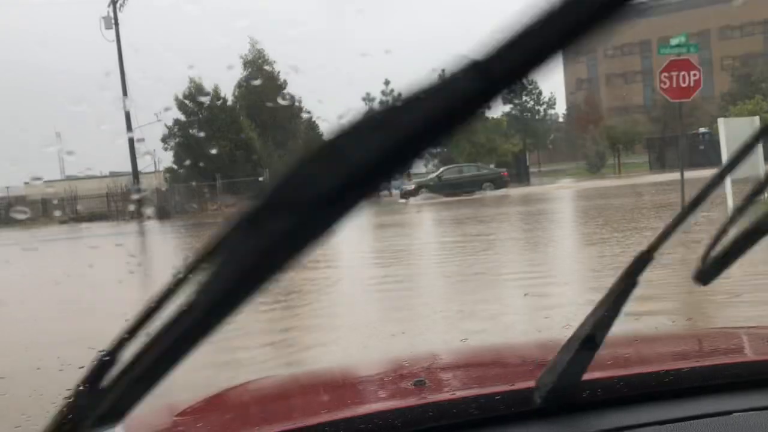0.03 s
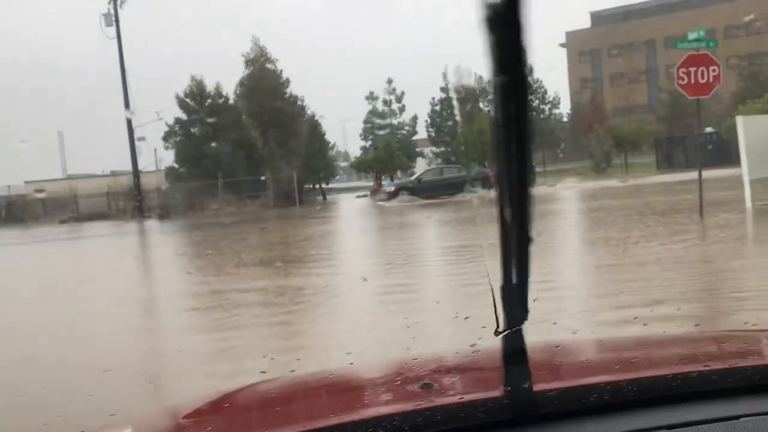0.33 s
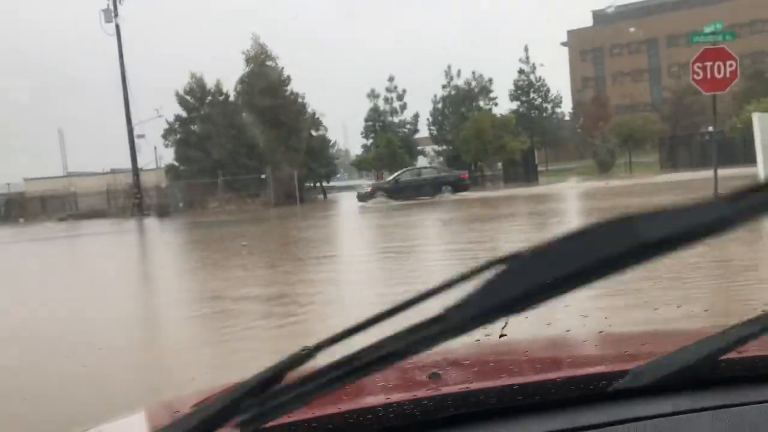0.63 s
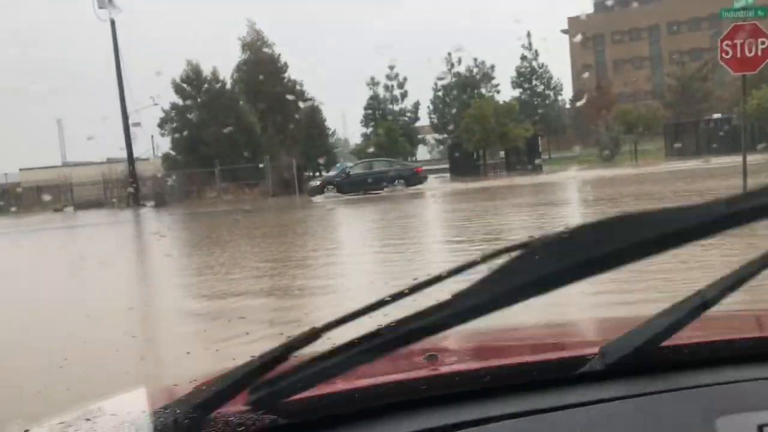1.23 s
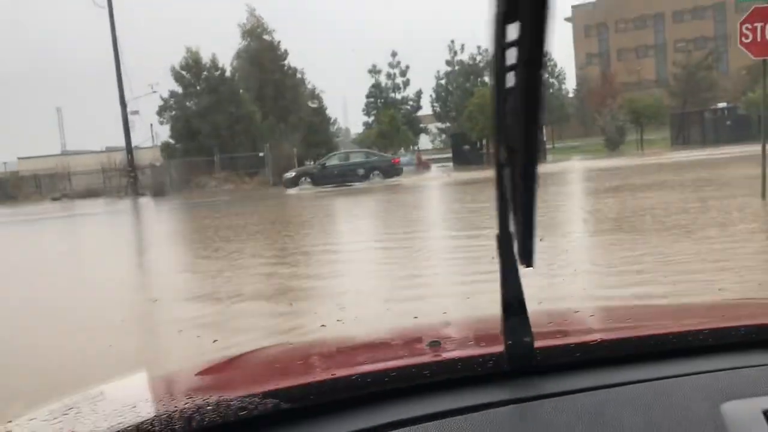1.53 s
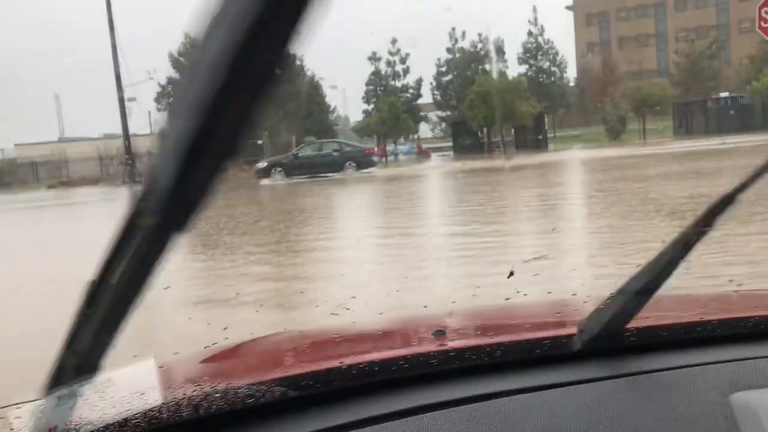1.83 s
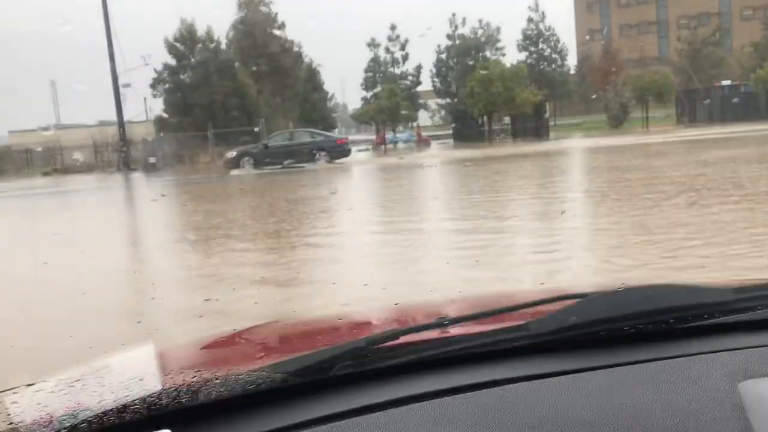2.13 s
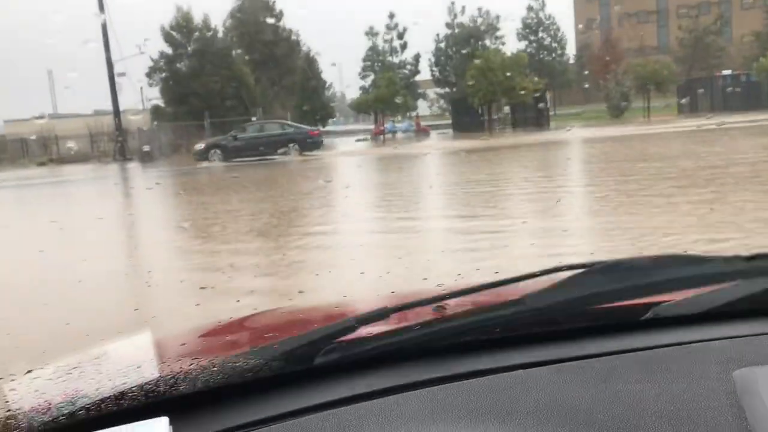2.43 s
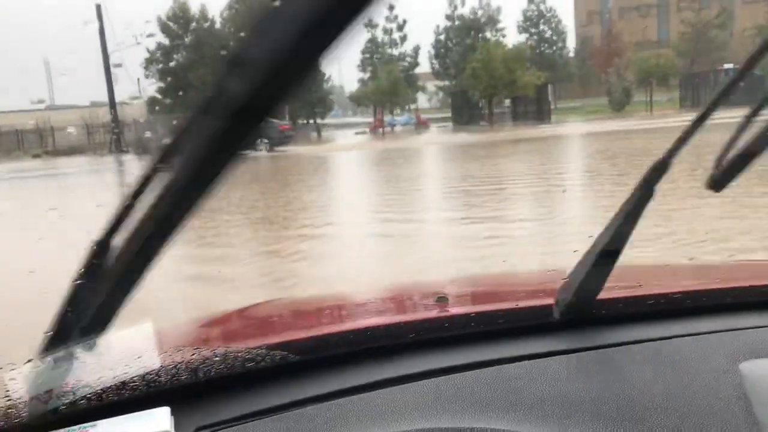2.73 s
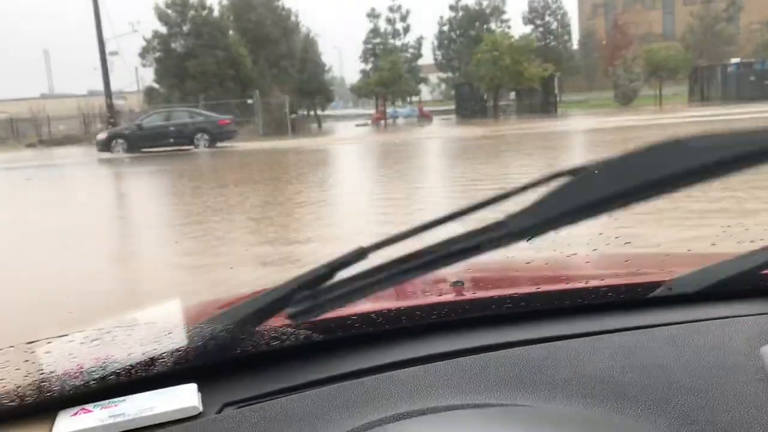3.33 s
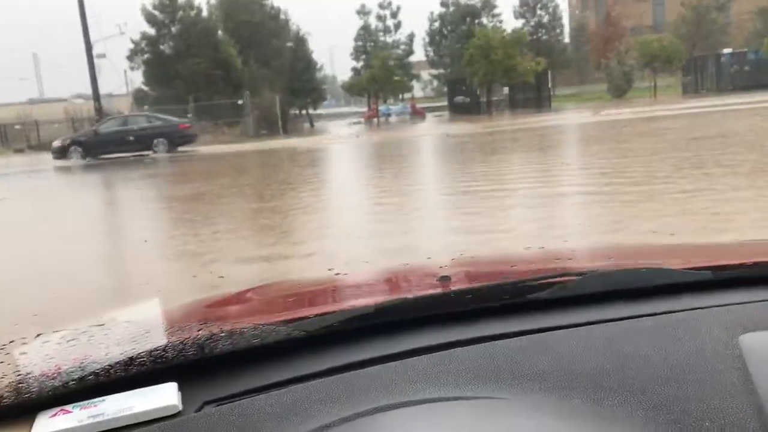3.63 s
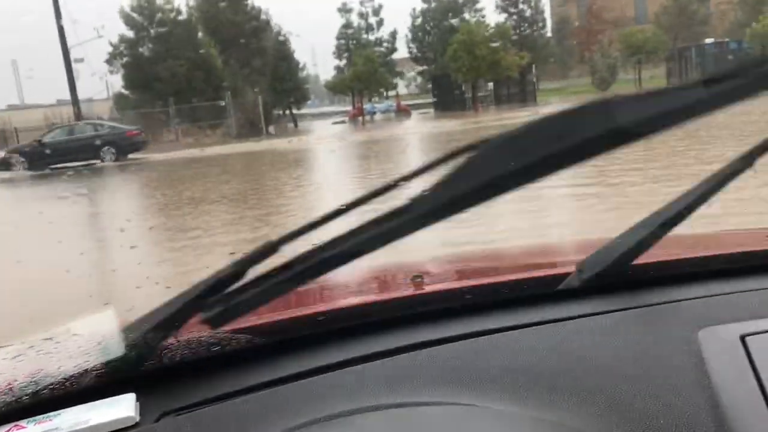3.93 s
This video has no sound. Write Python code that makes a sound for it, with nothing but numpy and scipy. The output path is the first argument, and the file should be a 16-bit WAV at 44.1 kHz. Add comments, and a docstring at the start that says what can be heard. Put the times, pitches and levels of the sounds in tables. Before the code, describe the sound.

Windshield wipers thump and swish quickly, heard inside an idling car in soft rain.

```python
"""Windscreen wipers run fast, three sweeps up and back, heard inside a car idling in the rain.
At each end of the stroke the rubber blades flip over and the arms thump, deep at the top and more
wooden at the bottom. Between the turns the blades swish over the wet glass and the wiper motor hums.
Behind them the engine drones and soft rain falls on the car's body."""
import sys
import numpy as np
from scipy import signal
from scipy.fft import rfft, irfft
from scipy.io import wavfile
from scipy.ndimage import uniform_filter1d

SR = 44100
rng = np.random.default_rng(int(sys.argv[2]) if len(sys.argv) > 2 else 0)


def log_audio(samples):
    """Write samples as a 16-bit WAV file to the path given in sys.argv[1]."""
    # one column per channel
    frames = np.atleast_2d(samples).T
    # limit to full scale, then quantise
    limited = np.clip(frames, -1, 1)
    pcm = np.round(limited * 32767).astype(np.int16)
    wavfile.write(sys.argv[1], SR, pcm)


N = 176400

# how fast the engine fires: time_s, rate_hz
ENGINE_FIRING = [(0, 40.02), (1.1, 40.07), (1.3, 39.07), (1.8, 39.7), (3.3, 38.97), (3.55, 39.84),
                 (4, 39.43)]
# the engine's deepest tone: time_s, level_db
ENGINE_BOOM = [(0, -29.5), (.36, -30), (.45, -26.5), (.54, -31), (1.13, -30), (1.22, -35.5), (1.29, -29.5),
               (2.36, -32), (2.5, -35.5), (2.62, -32), (3.09, -30.5), (3.16, -37), (3.23, -41),
               (3.29, -27.5), (3.45, -30.5), (4, -30.5)]
# engine tones at 2 to 7 times the firing rate: level_db
ENGINE_OVERTONES = [-35.5, -45.5, -53.5, -58.5, -57, -60]
# low rumble in the cabin: frequency_hz, level_db
RUMBLE_COLOUR = [(25, -11.5), (48, 8.5), (65, 0), (95, -1.5), (130, -1), (200, -10), (300, -16.5),
                 (450, -23), (640, -25), (780, -42), (1500, -53)]
# the wash of rain: frequency_hz, level_db
RAIN_COLOUR = [(400, -15.5), (800, 5), (1500, -4.5), (2800, -7.5), (4000, -12), (4900, -16.5),
               (6300, -18), (7600, -22.5), (12000, -22), (16000, -25)]
# how the rain swells and eases: time_s, gain_db
RAIN_LEVEL = [(0, 3), (.6, 1.5), (1.2, 1), (2.5, 1), (3.3, 0), (4, 1.5)]
# the tick of single drops: frequency_hz, level_db
DROP_COLOUR = [(400, -8.5), (1200, 2), (2800, 2.5), (5000, -12.5), (12000, -18)]
# the wiper motor through one wipe: time_s, pitch_hz, gain_db
MOTOR_HUM = [(0, 295, -1.5), (.2, 305, -5), (.36, 290, -14.5), (0.548, 308, -9.5), (0.699, 327, 0.5),
             (0.879, 333, 2.5), (0.969, 324, 2), (1.031, 316, 8), (1.091, 295, -28.5), (1.242, 287, -2.5),
             (1.336, 295, -9)]
# rubber sliding on glass: frequency_hz, level_db
RUB_COLOUR = [(100, -18), (165, 18.5), (240, -1), (380, -5.5), (540, -20.5), (680, -14), (900, -23),
              (2500, -38.5), (5000, -50), (12000, -59)]
# rubber sticking and slipping: frequency_hz, level_db
CATCH_COLOUR = [(150, -5), (220, 1.5), (380, -3), (540, -17.5), (680, -13), (900, -28), (1800, -41)]
# light knocks as the blades flip over, with fainter knocks of the wipers in between: start_s, level_db
KNOCKS = [(0.188, -36.5), (.234, -42), (.287, -32), (.934, -27.5), (1.115, -37.5), (1.273, -35),
          (1.38, -37.5), (1.608, -39), (1.625, -32), (2.272, -27), (2.452, -36), (2.637, -37.5),
          (2.964, -33), (3.608, -27.5), (3.791, -44), (3.952, -39)]
# tones these knocks ring with (fade_s is the time to fall 60 dB): pitch_hz, level_db, fade_s
KNOCK_TONES = [(163.5, -5, 0.28), (250, -3, 0.067), (315, -2.5, 0.022), (406, -5, 0.058), (489, -10, 0.078),
               (623, -17.5, 0.093)]
# water squeezed out by a blade: peak_s, level_db, centre_hz, width_s
SQUELCHES = [(.290, -58, 2600, 0.0042), (.357, -58, 2000, 0.0046), (.928, -74, 5600, .006),
             (.957, -75, 6200, 0.0073), (1.032, -67, 3400, .004), (1.552, -68, 1500, 0.0047),
             (1.629, -59.5, 2700, 0.005), (1.701, -58.5, 2340, 0.0052), (1.845, -61, 1550, 0.0056),
             (2.275, -71, 5900, .007), (2.297, -69.5, 5750, 0.0091), (2.376, -65, 3000, 0.0056),
             (2.965, -61.5, 2640, 0.0055), (3.035, -68.5, 3206, .007), (3.61, -67, 4220, .006),
             (3.63, -70, 6050, 0.012), (3.711, -62.5, 3100, 0.0044)]
# a squelch's broad band of noise: multiple_of_centre, level_db
SQUELCH_SHAPE = [(.25, -17), (.6, -1), (1, 1), (1.3, -8), (1.8, -17), (3, -29.5)]
# tiny squeaks of the rubber edge: peak_s, level_db, centre_hz, width_s
SQUEAKS = [(1.612, -78, 9300, 0.013), (1.638, -79, 10900, .008)]
# a squeak's narrow band of noise: multiple_of_centre, level_db
SQUEAK_SHAPE = [(.85, -35), (.97, -6), (1, 7), (1.03, -6), (1.15, -35)]
# thumps at the top turn: start_s, level_db, pitch_ratio, rebound_after_s, rebound_db, slap_db
TOP_THUMPS = [(.350, -22.5, 0.98, .027, -13, -35.5), (1.699, -24, 1.005, .026, -5, -35.5),
              (3.026, -21.5, 1.01, .029, -15, -35.5)]
# thumps at the bottom turn: start_s, level_db, pitch_ratio, rebound_after_s, rebound_db, slap_db
BOTTOM_THUMPS = [(1.006, -25.5, 1.005, .0235, -4.5, -38), (2.348, -27.5, 1.02, 0.026, -7.5, -41.5),
                 (3.685, -25.5, 1.002, .0235, -5.5, -40)]
# the arms and the panel under them ringing at the top turn: pitch_hz, level_db, fade_s
TOP_TONES = [(111.46, -3.5, 0.63), (144.3, 6, .14), (180, -3.5, 0.13), (217.8, -5.5, 0.28),
             (262, -1, 0.142), (375, -1, 0.068), (431.6, -14, 0.12), (638.5, -21.5, 0.11), (810, -35, 0.07),
             (970, -51, 0.068)]
# the same parts ringing at the bottom turn: pitch_hz, level_db, fade_s
BOTTOM_TONES = [(117.7, -2.5, 0.39), (165, -3, 0.13), (279, -8, 0.12), (339, 2.5, 0.07),
                (372.7, -8.5, 0.12), (438.8, -10.5, 0.19), (578.5, -8, 0.085), (878, -29.5, .07),
                (1153, -31.5, 0.096)]
# wet rubber slapping the glass: frequency_hz, level_db
SLAP_COLOUR = [(150, -1.5), (350, 8.5), (600, -8.5), (900, -15), (1500, -28), (2800, -40), (4500, -47),
               (9000, -55), (15000, -54.5)]

WIPE_S, TOP_TURN_S, BOTTOM_TURN_S = 1.336, 0.4, 1.1  # one wipe, and when in it the blades turn


def undb(db):
    """Turn decibels into a number to multiply by."""
    return 10 ** (np.asarray(db) / 20)


def clock():
    """The time of each sample, in seconds."""
    return np.arange(N) / SR


def curve(rows):
    """Join (time_s, value) points with straight lines."""
    times, values = np.array(rows).T
    return np.interp(clock(), times, values)


def colour(sound, points):
    """Set a sound's lows and highs by (frequency_hz, level_db) points, then scale it to strength 1."""
    hz, db = np.array(points).T
    freqs = np.maximum(np.arange(len(sound) // 2 + 1) * SR / len(sound), 1)
    gain = undb(np.interp(np.log(freqs), np.log(hz), db))
    edge_fade = np.minimum(freqs / hz[0], 1) ** 2 * np.minimum(hz[-1] / freqs, 1) ** 2
    shaped = irfft(rfft(sound) * gain * edge_fade, len(sound))
    return shaped / shaped.std()


def noise(points):
    """Steady noise with the given colour."""
    return colour(rng.standard_normal(N), points)


def wobble(rate_hz):
    """A smooth random drift, typically about 1 either side of zero."""
    step = int(SR / rate_hz)
    stairs = np.repeat(rng.standard_normal(400), step)[:N]
    smooth = uniform_filter1d(uniform_filter1d(stairs, step), step)
    return smooth / smooth.std()


def swell(peak_s, width_s):
    """A bell-shaped rise and fall."""
    return np.exp(-.5 * ((clock() - peak_s) / width_s) ** 2)


def ring(start_s, tones, attack_s):
    """A part takes one soft blow and rings with several tones that die away."""
    t = np.arange(SR // 3) / SR
    ringing = 0
    for k, (hz, db, fade_s) in enumerate(tones):
        pitch_hz = hz * (1 + 0.0034 * rng.standard_normal())
        ringing += (-1) ** k * undb(db - 60 * t / fade_s) * np.sin(2 * np.pi * pitch_hz * t)
    onset = 1 - np.exp(-(t / attack_s) ** 2)
    return np.interp(clock() - start_s, t, ringing * onset, left=0, right=0)


def bursts(rows, shape):
    """Short swells of noise, each around its own centre frequency."""
    out, t = 0, np.arange(-SR // 20, SR // 20) / SR
    for peak_s, db, centre_hz, width_s in rows:
        band = [(centre_hz * multiple, band_db) for multiple, band_db in shape]
        hiss = colour(rng.standard_normal(len(t)), band)
        level = undb(db) * np.exp(-.5 * (t / width_s) ** 2)
        out += np.interp(clock(), peak_s + t, level * hiss, left=0, right=0)
    return out


def engine():
    """The idling engine booms in the cabin at its firing rate and multiples of it, over a low rumble."""
    phase = 2 * np.pi * np.cumsum(curve(ENGINE_FIRING)) / SR
    boom = undb(curve(ENGINE_BOOM) + 0.63 * wobble(42)) * np.sin(phase + 0.3 * wobble(4))
    overtones = 0
    for multiple, db in enumerate(ENGINE_OVERTONES, start=2):
        level = undb(db + 1.64 * wobble(12))
        overtones -= level * np.cos(multiple * phase + 0.043 * (multiple - 1) * wobble(17))
    rumble = undb(-40 + 1.5 * wobble(10)) * noise(RUMBLE_COLOUR)
    return np.sqrt(2) * (boom + overtones) + rumble


def rain(drops_per_s=270):
    """A muffled wash of rain, with single drops ticking on glass and roof."""
    hits = rng.random(N) < drops_per_s / SR
    strength = undb(2 * np.minimum(rng.exponential(size=N), 2))
    drops = undb(-77) * colour(hits * strength, DROP_COLOUR)
    wash = undb(-66 + .5 * wobble(10)) * noise(RAIN_COLOUR)
    return undb(curve(RAIN_LEVEL)) * (wash + drops)


def wiper_motor():
    """The motor hums, slowing under load and rising in pitch on the easy downstroke."""
    times, hz, db = np.array(MOTOR_HUM).T
    into_wipe_s = clock() % WIPE_S
    pitch_hz = np.interp(into_wipe_s, times, hz) * (1 + 0.00482 * wobble(29.81))
    phase = 2 * np.pi * np.cumsum(pitch_hz) / SR
    hum = undb(-55.5 + 2 * wobble(23)) * np.sin(phase)
    octave = undb(-64 + 0.5 * wobble(15)) * np.sin(2 * phase)
    return np.sqrt(2) * undb(np.interp(into_wipe_s, times, db)) * (hum + octave)


def blade_swish(catches_per_s=70, lead_s=0.12):
    """The rubber drags and catches on the glass, hardest on the way up to the top turn."""
    drag = sum(undb(db) * swell(turn_s + wipe * WIPE_S - lead_s, width_s=0.12)
               for wipe in range(4) for turn_s, db in [(TOP_TURN_S, -44), (BOTTOM_TURN_S, -49)])
    catches = (rng.random(N) < catches_per_s / SR) * rng.uniform(0.58, 1, N)
    t = np.arange(SR // 20) / SR
    scuff = rng.standard_normal(len(t)) * np.exp(-t / 0.0067)
    scuffs = signal.fftconvolve(catches, scuff)[:N]  # one scuff at every catch
    sliding = undb(0.6 * wobble(66)) * noise(RUB_COLOUR)
    return drag * (sliding + undb(-3) * colour(scuffs, CATCH_COLOUR))


def arm_shudder(delay_s=0.11):
    """The arms give a short, low shake as they set off from the bottom."""
    level = undb(-38) * sum(swell(thump[0] + delay_s, width_s=0.046) for thump in BOTTOM_THUMPS)
    pitch_hz = 164.7 * (1 + 0.0163 * wobble(30.18))
    return np.sqrt(2) * level * np.sin(2 * np.pi * np.cumsum(pitch_hz) / SR)


def wiper_knocks():
    """The blades knock lightly as they flip over, with fainter knocks of the wipers in between."""
    return sum(undb(db) * ring(start_s, KNOCK_TONES, attack_s=0.003) for start_s, db in KNOCKS)


def wet_rubber():
    """The blades squeeze out water as they flip over, and the rubber edge gives two tiny squeaks."""
    return bursts(SQUELCHES, SQUELCH_SHAPE) + bursts(SQUEAKS, SQUEAK_SHAPE)


def arm_thumps(rows, tones, attack_s, slap_rise_s=0.013, slap_decay_s=0.024):
    """At a turn the blades slap the glass; the arms run out of slack, thump and bounce back once."""
    thumps, slap_level = 0, 0
    for start_s, db, pitch_ratio, rebound_after_s, rebound_db, slap_db in rows:
        tuned = np.array(tones) * [pitch_ratio, 1, 1]
        blow = ring(start_s, tuned, attack_s)
        rebound = undb(rebound_db) * ring(start_s + rebound_after_s, tuned, attack_s)
        thumps += undb(db) * (blow + rebound)
        age_s = clock() - start_s - 0.0022  # the slap peaks just after the blow
        slap_level += undb(slap_db) * np.exp(np.minimum(age_s / slap_rise_s, -age_s / slap_decay_s))
    return thumps + slap_level * noise(SLAP_COLOUR)


def scene():
    """Everything as heard from the front seat, in one channel."""
    top = arm_thumps(TOP_THUMPS, TOP_TONES, attack_s=0.0087)
    bottom = arm_thumps(BOTTOM_THUMPS, BOTTOM_TONES, attack_s=0.005)
    background = engine() + rain()
    wipers = wiper_motor() + blade_swish() + arm_shudder() + wiper_knocks() + wet_rubber()
    return (background + wipers + top + bottom)[None]


def record(dry, cutoff_hz=15750):
    """Cut away the very highest treble."""
    return signal.sosfilt(signal.ellip(10, .1, 80, cutoff_hz, fs=SR, output="sos"), dry)


dry = scene()
out = record(dry)
log_audio(out)
```